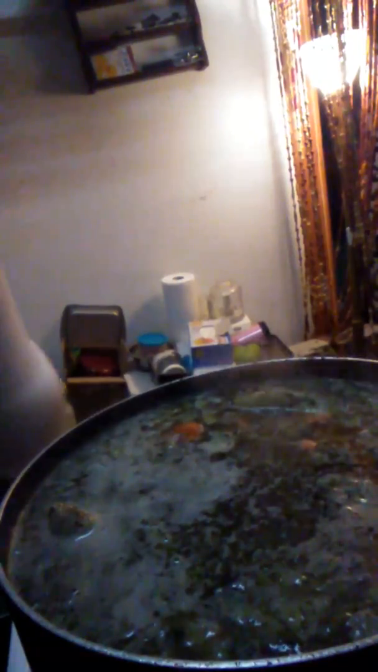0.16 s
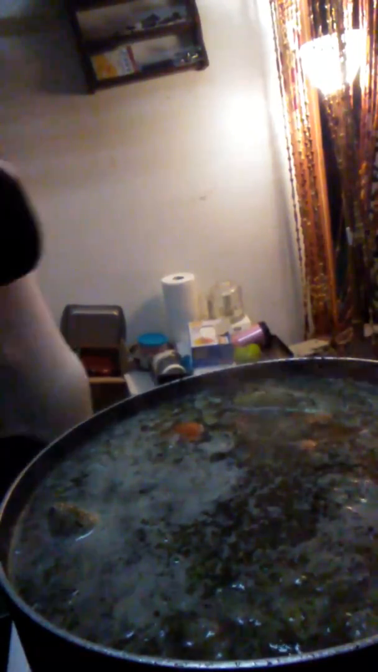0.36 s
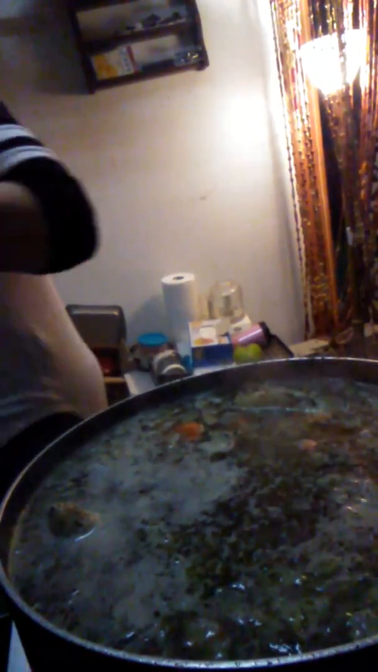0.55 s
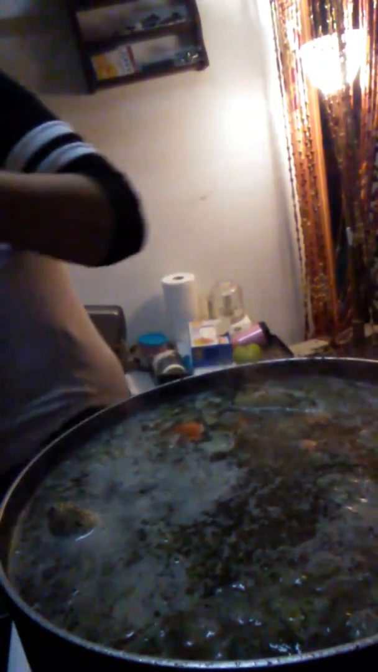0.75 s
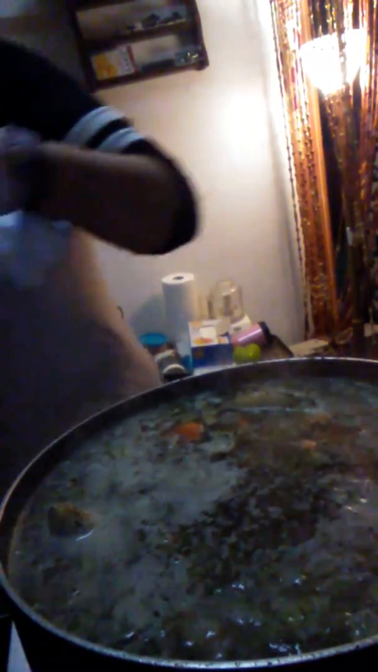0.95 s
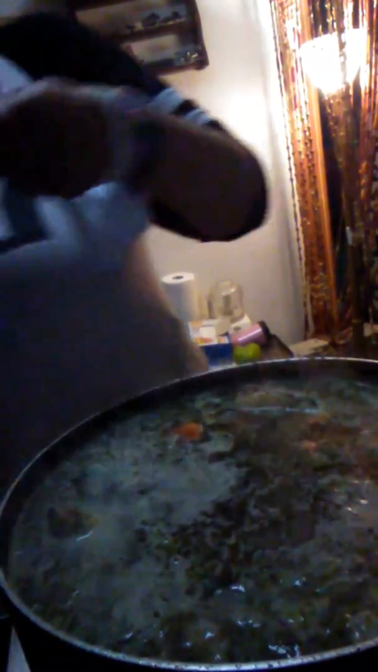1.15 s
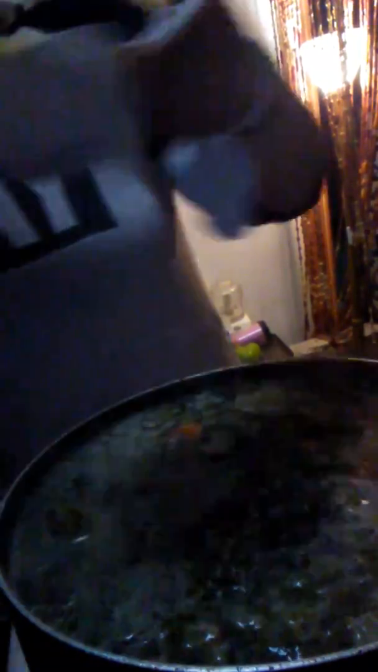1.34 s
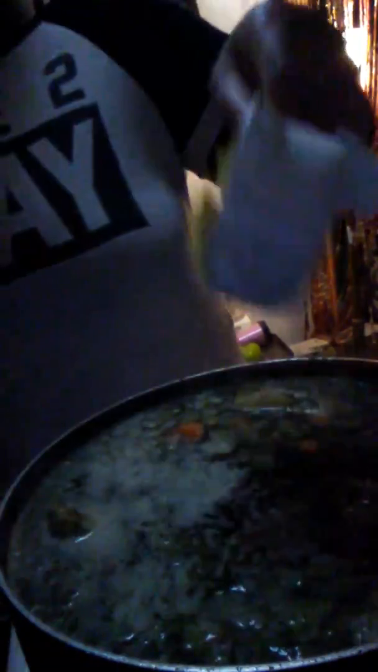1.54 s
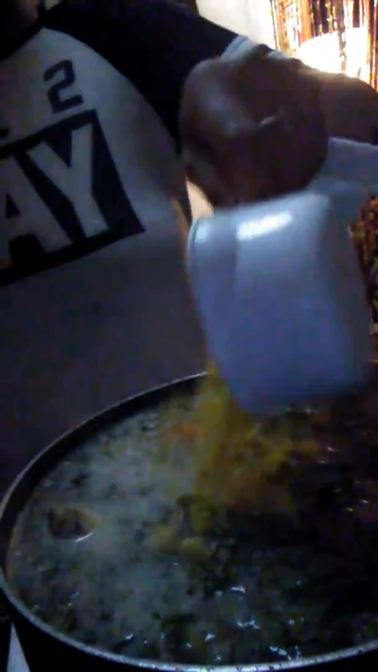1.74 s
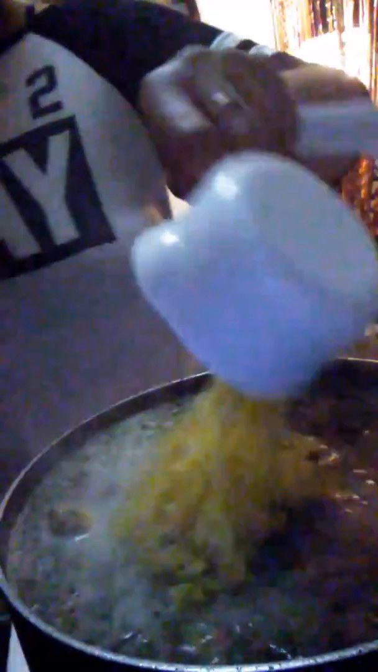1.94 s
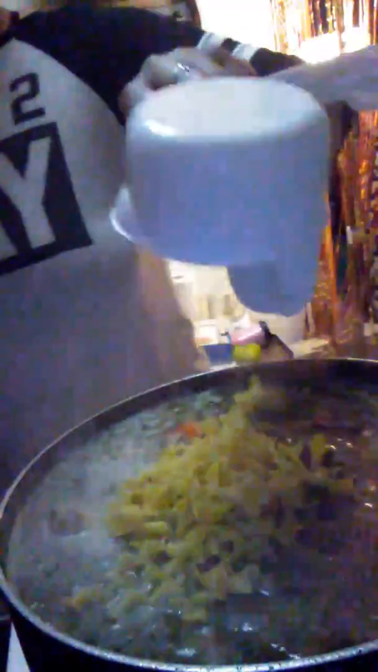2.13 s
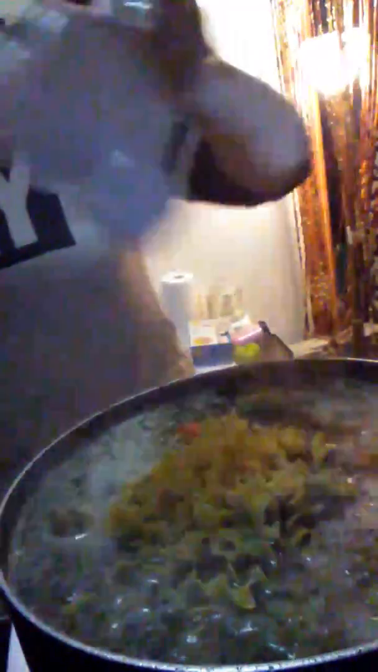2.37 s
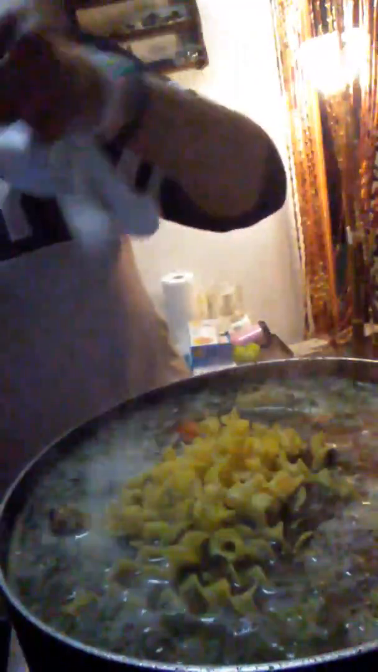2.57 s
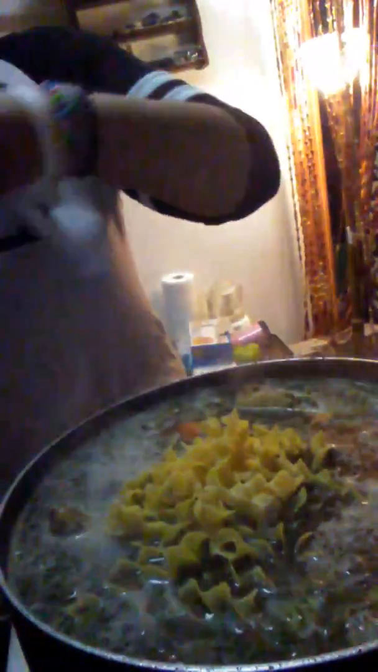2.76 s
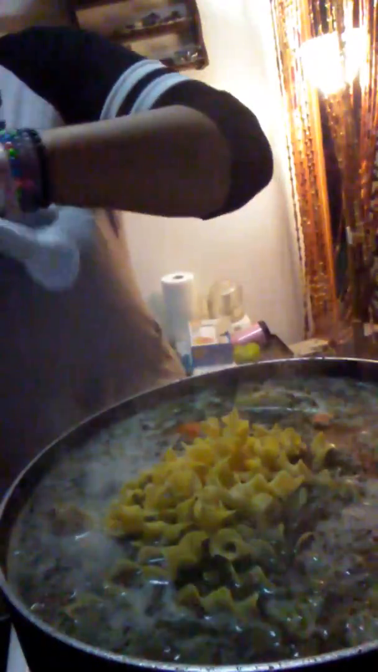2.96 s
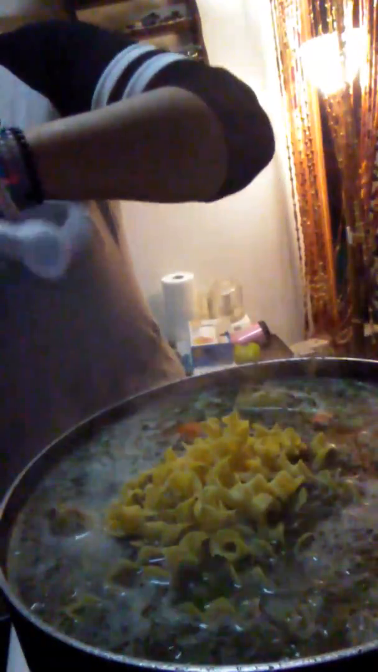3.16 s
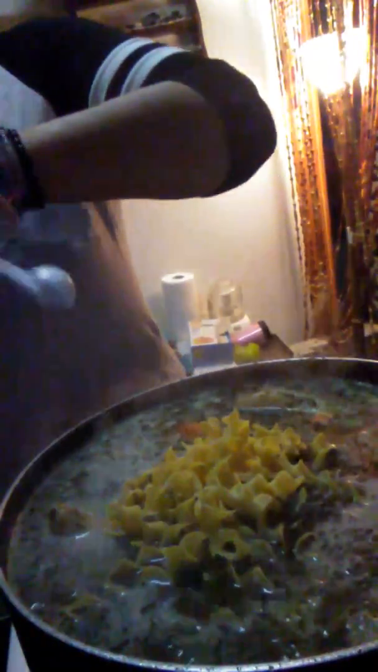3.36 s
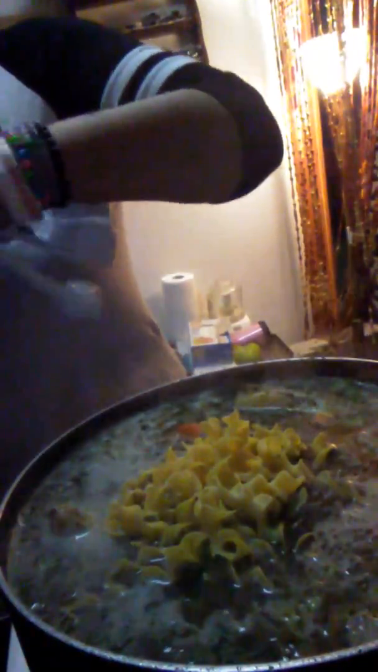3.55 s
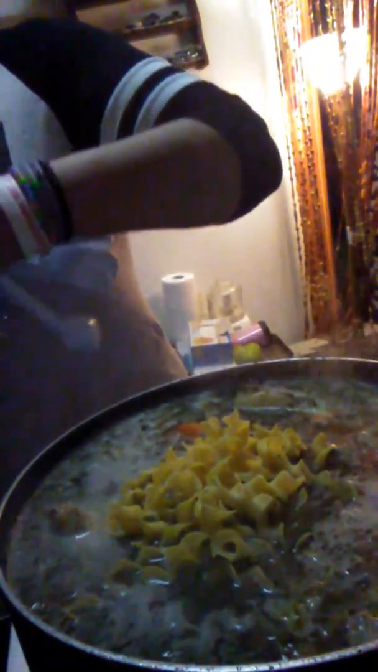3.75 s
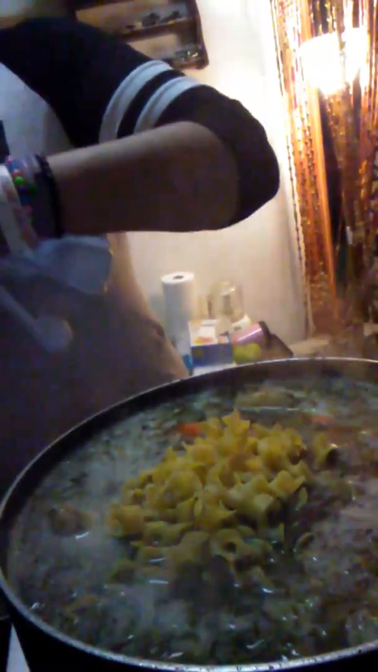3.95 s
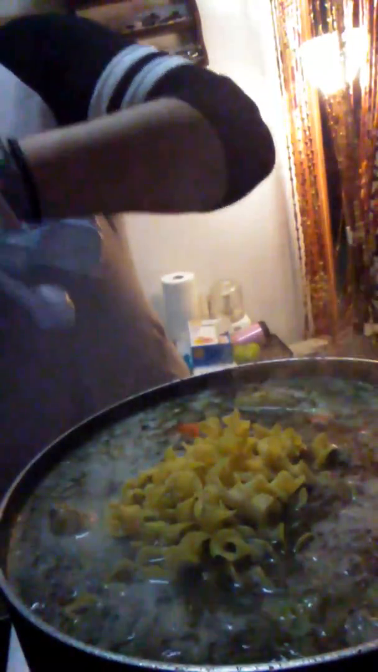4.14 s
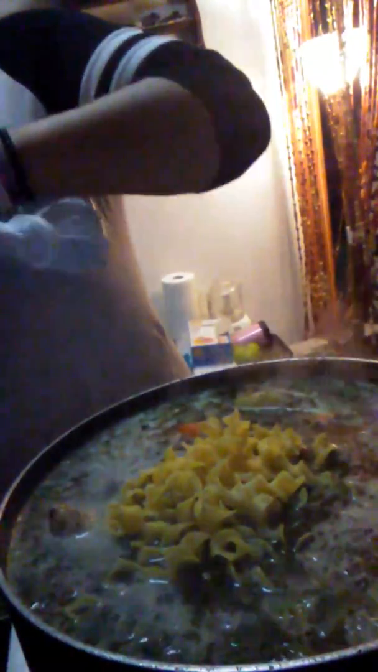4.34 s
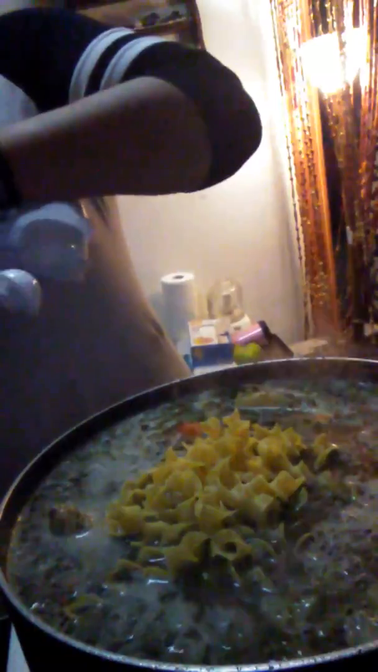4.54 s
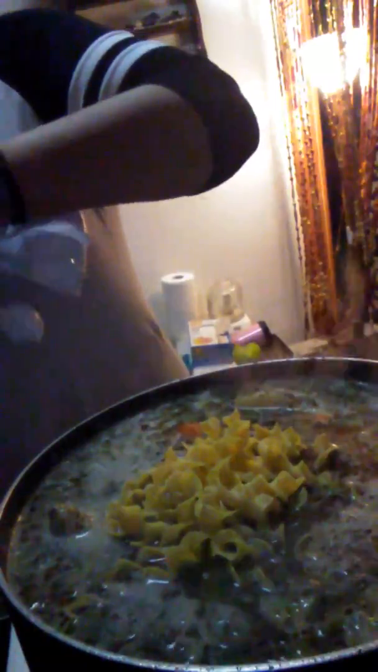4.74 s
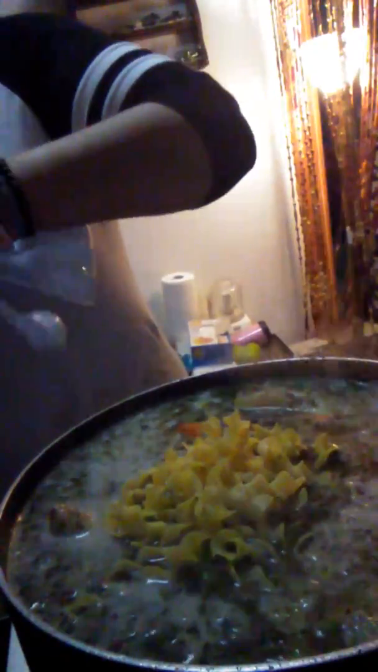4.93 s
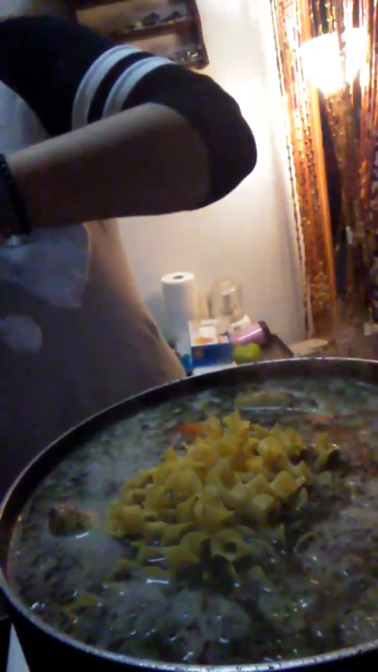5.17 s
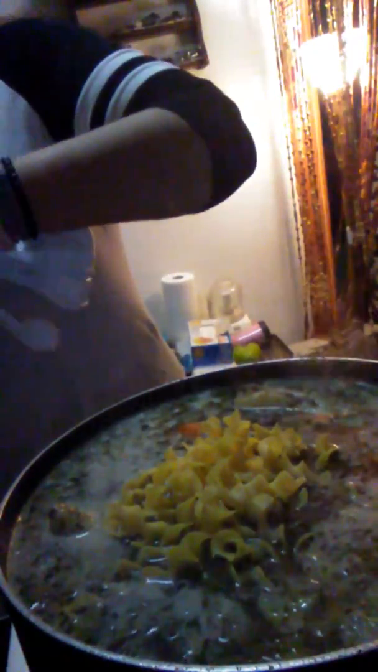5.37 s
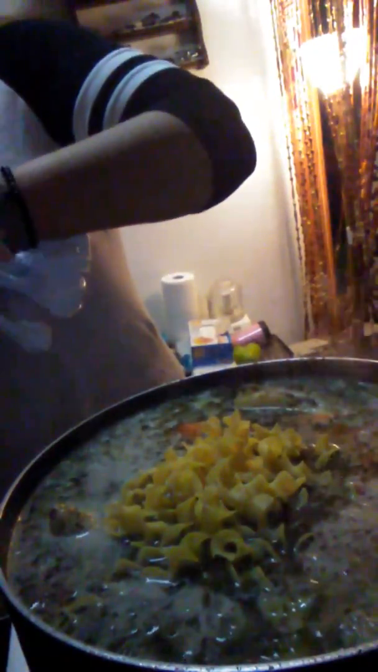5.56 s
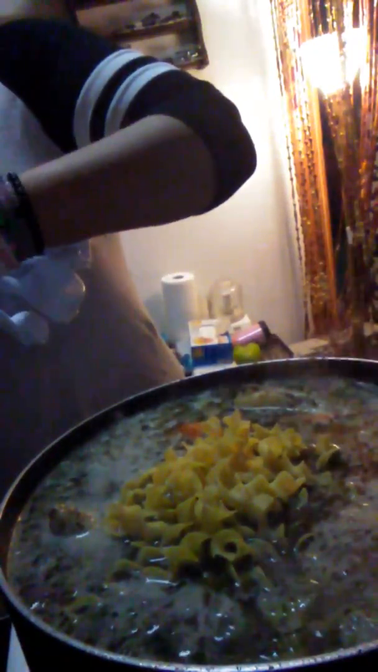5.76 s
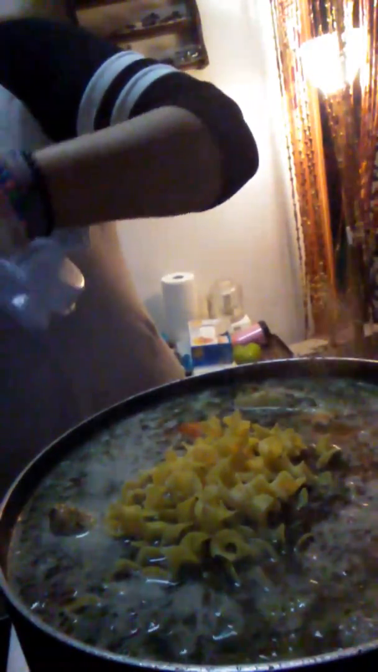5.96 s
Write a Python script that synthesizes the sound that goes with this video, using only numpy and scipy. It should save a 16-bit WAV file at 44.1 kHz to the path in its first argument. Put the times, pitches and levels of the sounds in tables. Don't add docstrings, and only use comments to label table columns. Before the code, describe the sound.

Dry noodles rustle in a plastic bag, clatter from a cup into a simmering pot, then rattle loudly in repeated hard shakes.

```python
import sys
import numpy as np
from scipy import signal
from scipy.fft import rfft, irfft
from scipy.io import wavfile
from scipy.ndimage import uniform_filter1d

SR = 44100
rng = np.random.default_rng(int(sys.argv[2]) if len(sys.argv) > 2 else 0)


def linear_from_db(decibels):
    return 10 ** (np.asarray(decibels, float) / 20)


def generate_wav(signal):
    frames = np.transpose(np.atleast_2d(signal))
    scaled = np.clip(frames, -1, 1) * 32767
    pcm = np.round(scaled).astype(np.int16)
    wavfile.write(sys.argv[1], SR, pcm)


N = 264776


def evened(x):
    return x / np.sqrt(np.mean(x ** 2) + 1e-20)


def read(points, hz):
    f, value = np.transpose(points)
    return np.interp(np.log(hz + 1), np.log(f + 1), value)


def add(mix, s, sound):
    part = mix[..., round(s * SR):][..., :sound.shape[-1]]
    part += sound[..., :part.shape[-1]]


def coloured(x, colour, body=()):
    hz = np.fft.rfftfreq(len(x), 1 / SR)
    lift_db = sum(db / (1 + (2 * (hz - f) / width) ** 2) for f, width, db in body)
    return irfft(rfft(x) * linear_from_db(read(colour, hz) + lift_db), len(x))


def ringing(x, hz, width):
    r = np.exp(-np.pi * width / SR)
    poles = [1, -2 * r * np.cos(2 * np.pi * hz / SR), r * r]
    once = signal.lfilter([1, 0, -1], poles, x)
    return evened(signal.lfilter([1, 0, -1], poles, once))


def lumps(count, seconds):
    span = max(round(seconds * SR / 16), 2)
    coarse = rng.standard_normal(count // 16 + 2)
    coarse = uniform_filter1d(uniform_filter1d(coarse, span), span)
    return np.interp(np.arange(count) / 16, np.arange(len(coarse)), evened(coarse))


def clumps(count, per_s, lasts):
    draw = rng.random(count) * SR / per_s
    landed = signal.lfilter([1], [1, -np.exp(-1 / (lasts * SR))], -np.log(np.minimum(draw, 1)))
    return evened(np.log(landed + 0.43) - np.log(landed + 0.34).mean())


def grains(count, lo_hz, hi_hz, per_s, spread_db, cycles, drift_db, kinds):
    out = np.zeros(count)
    for hz in np.geomspace(lo_hz, hi_hz, kinds):
        draw = rng.uniform(-1, 1, count) * kinds * SR / per_s
        hit = np.flatnonzero(abs(draw) < 1)
        blows = np.zeros(count)
        blows[hit] = np.sign(draw[hit]) * linear_from_db(spread_db * np.minimum(-np.log(abs(draw[hit])), 5))
        blows *= linear_from_db(drift_db * lumps(count, 0.056))
        turns = np.arange(round(8 * cycles * SR / hz)) * hz / SR
        click = np.sin(2 * np.pi * turns) * turns * np.exp(-turns / cycles)
        click /= np.linalg.norm(click)
        out += np.sqrt(hz) * signal.oaconvolve(evened(blows), click)[:count]
    return out


def splinters(count, colour, body):
    draw = rng.random(count) * SR / 160
    blows = (draw < 1) * linear_from_db(2.3 * np.minimum(-np.log(draw + 1e-12), 3))
    tail = np.exp(-np.arange(800) / SR / 0.0014)
    hiss = np.diff(rng.standard_normal(count + 1))
    return evened(coloured(hiss, colour, body)) * signal.oaconvolve(blows, tail)[:count]


def busier(thin_db, rel_db, follow):
    return rel_db - 20 + follow * (thin_db + 20)


def rattle(efforts, middle_law, hollow_law, slips, colour, body, per_s, spread_db, lumpy_db, slip_db,
           pitched_db, hollow_slip_db, drift_db, thin_hz, rise_s, thin_slip_db):
    s, effort_db = np.transpose(efforts)
    t = np.arange(s[0], s[-1], 1 / SR)
    count = len(t)
    thin_db = np.interp(t, s, effort_db)
    power = linear_from_db(2 * np.array([thin_db, busier(thin_db, *middle_law), busier(thin_db, *hollow_law)]))

    after, pitched = np.arange(SR // 5) / SR, np.zeros(count)
    onset = 1 - np.exp(-after / rise_s)
    jostle = rng.standard_normal((len(slips), len(after)))
    for (at, peak_db, middle, hz, t60), noise in zip(slips, jostle):
        thin = thin_slip_db - 18 * max(np.log2(4500 / hz), 0)
        shares_db = np.array([[thin], [middle], [middle + hollow_slip_db]])
        add(power, at - s[0], linear_from_db(2 * (peak_db + slip_db + shares_db) - 120 * after / t60) * onset ** 2)
        tumble = onset * linear_from_db(pitched_db - 60 * after / t60) * ringing(noise, hz, 0.19 * hz)
        add(pitched, at - s[0], linear_from_db(peak_db + slip_db) * tumble)

    thin_clicks = grains(count, thin_hz, 16400, per_s, spread_db, 0.87, drift_db, kinds=12)
    middle_clicks = grains(count, 1030, 0.906 * thin_hz, 0.6 * per_s, spread_db, 1.22, drift_db, kinds=10)
    hollow_clicks = grains(count, 154.6, 928, 0.3 * per_s, 1.12 * spread_db, 0.53, 1.5, kinds=8)

    clumps_db = lumpy_db * clumps(count, per_s=24, lasts=0.014)
    out = pitched + linear_from_db(-8) * np.sqrt(power[0]) * splinters(count, colour, body)
    for p, clicks in zip(power, (thin_clicks, middle_clicks, hollow_clicks)):
        unevenness = linear_from_db(clumps_db + 1.1 * lumpy_db * lumps(count, 0.022))
        out += np.sqrt(p) * evened(coloured(clicks, colour, body) * unevenness)
    return s[0], out


# start in seconds, peak in dB, pitch in Hz, t60 in seconds.
POT_BUBBLES = [(0.57, -37, 744, 0.046), (0.675, -32, 623, 0.071), (1.136, -53, 620, 0.11),
               (1.428, -55, 557, 0.27), (1.506, -57, 573, 0.13), (1.547, -46, 620, 0.071),
               (1.649, -42, 607, 0.07), (1.746, -48, 604, 0.13), (1.867, -38, 617, 0.075),
               (2.127, -42, 633, 0.081), (2.276, -49, 614, 0.063), (2.31, -47, 610, 0.064),
               (2.367, -53, 614, 0.091), (2.477, -54, 625, 0.1), (2.567, -43.5, 630, 0.061)]
# time in seconds, level in dB.
BOIL_LEVEL = [(0.0, -52), (0.25, -53), (0.33, -41.5), (0.87, -46.5), (1.0, -43.5), (2.0, -48), (2.17, -56),
              (2.29, -44), (6.0, -63)]
# frequency in Hz, density in dB per Hz.
BOIL_COLOUR = [(8.8, -50), (15, -23), (27, -40), (59, 7), (119, -2), (178, -15.5), (200, -13), (260, -20),
               (440, -120)]
# frequency in Hz, density in dB per Hz.
SIMMER_COLOUR = [(76, -41), (130, 4), (363, -2), (554, -0.5), (625, 3), (812, -4), (1710, 2.5), (2220, -14),
                 (2830, -26), (4320, -60), (6470, -13), (11600, -28), (16000, -38)]


def pot(shakes):
    out, t = np.zeros(N), np.arange(SR // 4) / SR
    for s, peak_db, hz, t60 in POT_BUBBLES:
        swell = 1 - np.exp(-t / 0.0048)
        add(out, s, linear_from_db(peak_db + 12 - 60 * t / t60) * swell * np.sin(2 * np.pi * hz * t))

    now = np.arange(N) / SR
    s, boil_db = np.transpose(BOIL_LEVEL)
    boil = linear_from_db(np.interp(now, s, boil_db))
    effort_db = np.interp(now, *np.transpose(shakes), left=-90)
    jolt = linear_from_db(-46.5 + 0.79 * (effort_db + 23.5))
    rumble = evened(coloured(rng.standard_normal(N), BOIL_COLOUR + [(400, -62)]))

    fizz = coloured(rng.standard_normal(N), [(60, -50)] + SIMMER_COLOUR, [(559, 37, 6.7)])
    fizz *= linear_from_db(1.7 * lumps(N, 0.019))
    return out + np.hypot(boil, jolt) * rumble + linear_from_db(-52) * evened(fizz)


# time in seconds, effort in dB.
BAG_HANDLING = [(0.0, -24.5), (0.09, -37), (0.27, -39), (0.36, -48), (0.65, -42), (0.72, -42), (0.935, -53),
                (1.017, -27.5), (1.14, -44)]
# start in seconds, peak in dB, middle clicks in dB relative to it,
# pitch of the pieces in Hz, t60 in seconds.
BAG_SLIPS = [(0.0186, -23, 4.5, 6400, 0.21), (0.0967, -9.5, -32, 5330, 0.15),
             (0.2324, -17.5, -21, 6500, 0.26), (0.3217, -19, -8, 7840, 0.17), (0.34, -20, -4, 8400, 0.44),
             (0.386, -17.5, -2, 7400, 0.28), (0.4494, -19.5, -2, 6960, 0.17), (0.526, -17, -6, 6980, 0.16),
             (0.5584, -14.5, -11.5, 5150, 0.14), (0.6285, -39, -15, 6880, 0.073),
             (0.6595, -16.5, -3.5, 5900, 0.21), (0.71, -14.5, -4.5, 6200, 0.31),
             (0.7524, -15, -3, 6480, 0.069), (0.943, -17.5, -7, 8450, 0.19),
             (0.9592, -14, -1.5, 5630, 0.12), (1.0086, 2.5, -8, 6300, 0.039),
             (1.0274, -12.5, -7, 6470, 0.13), (1.1094, -22, -20, 6940, 0.073)]
BAG_CREAKS = [(0.1093, -14, -29, 2460, 0.22), (0.2107, -15, -25, 2300, 0.098),
              (0.8043, -20.5, -19, 3200, 0.13), (1.0496, -12, -8, 3970, 0.15)]
# frequency in Hz, density in dB per Hz.
BAG_COLOUR = [(88, -36), (150, -9), (303, -13), (622, -5), (686, -15), (1210, -10.5), (2250, -6.5),
              (3390, -4.5), (6700, 4), (9000, -2), (11600, -10.5), (15800, -22)]
# frequency in Hz, width in Hz, lift in dB.
BAG_RESONANCES = [(2750, 950, 3), (5570, 400, 2)]


def rustling():
    return rattle(
        BAG_HANDLING, (-9, 0.85), (-18, 0.7), BAG_SLIPS + BAG_CREAKS, BAG_COLOUR, BAG_RESONANCES,
        per_s=7000, spread_db=2, lumpy_db=1.5, slip_db=-10.5, pitched_db=-5.5, hollow_slip_db=-9,
        drift_db=1, thin_hz=4300, rise_s=0.0017, thin_slip_db=0.3)


# start in seconds, peak in dB, pitch in Hz.
NOODLE_CRACKS = [(0.0975, -18, 4900), (0.3899, -15, 7400), (0.6707, -18, 6100), (0.7527, -14, 6500),
                 (0.9417, -15, 8100), (0.96, -19, 2770), (1.0088, -1, 6500), (0.7095, -20, 2800),
                 (0.527, -25, 7000), (1.16, -24, 6800), (1.3252, -32, 6740),
                 (1.6837, -10, 8100), (1.686, -9, 6440), (1.7379, -3, 7400), (1.7383, -12, 6200),
                  (1.742, -9, 6800), (1.801, -6, 6400), (1.8142, -7, 5700), (1.8216, -7, 7800),
                  (1.8317, -5, 9600), (1.8591, -18, 5800), (1.87, -14, 6300), (1.8765, -1, 8500),
                  (1.8844, -4, 6200), (1.8903, -4, 5750), (1.9361, -14, 9100), (1.941, -11, 6200),
                  (1.954, -3, 6700), (1.996, -3, 7500), (2.0084, -6, 7500), (2.0187, -4, 6900),
                  (2.026, -6, 6500), (2.0907, -2, 7900), (2.125, -11, 8800), (2.142, -9, 6500),
                  (2.1828, -12, 6800), (2.1964, -14, 8300), (2.2625, -20, 9000),
                 (2.6726, -21, 7000), (2.7132, -22, 7100), (2.7397, -8.5, 2730), (2.7496, -4, 6900),
                      (2.777, -1, 6300), (2.8412, -13, 6500), (2.8586, -12, 9300), (2.8753, -6, 8200),
                      (2.9049, -8, 5200), (2.9256, -16, 5370), (2.9671, -11, 2800), (2.9849, -13, 6300),
                      (2.994, -20, 2900), (3.0147, -8, 5700), (3.0888, -8, 5300), (3.0966, -5, 5400),
                      (3.1194, 0, 5600), (3.1712, -4, 7100), (3.2273, -7, 6300), (3.2393, 0, 5800),
                      (3.2592, -2, 7500), (3.2818, -2, 6800), (3.3605, 1, 8800), (3.3806, -13, 5900),
                      (3.4056, -1, 7400), (3.4199, 0, 6000), (3.4496, -1, 5900), (3.4947, -5, 6100),
                      (3.5521, -2, 6500), (3.5925, -2, 5800), (3.8423, -8, 6600), (3.8503, -4, 7400),
                      (3.8582, -5, 6500), (3.8721, -6, 6100), (3.8859, -1, 6600), (3.9688, -1, 7100),
                      (4.0871, -11, 3600), (4.1698, -9, 7000), (4.226, -12, 6100), (4.2353, 4, 6100),
                      (4.2787, -12, 3900), (4.295, -6, 6700),
                 (4.339, 11, 6560), (4.4152, -4, 6600), (4.4539, -9, 7500), (4.4602, 1, 6300),
                     (4.503, -10, 6100), (4.51, -7, 5800), (4.519, -5, 6700), (4.5265, 1.5, 3970),
                     (4.5655, -15, 6500), (4.6488, -4.5, 2530), (4.6611, -8, 6800), (4.6825, -7, 6040),
                     (4.7383, 0, 6960), (4.7578, -8, 6700), (4.8014, -8, 6700), (4.8246, -1.5, 6600),
                     (4.8513, -12, 3100), (4.8649, -8, 8000), (4.8752, -8, 7000), (4.882, 2, 8800),
                     (4.9043, -4, 6700), (4.9234, -8, 6800), (4.9456, -11, 7000), (4.953, 2, 6360),
                     (4.9612, -3, 5900), (4.9922, -3, 6700), (5.0277, -8, 3500), (5.0415, 3, 6200),
                     (5.068, -4, 3900), (5.097, 2, 7000), (5.1524, -10, 8300), (5.2027, -20, 6800),
                     (5.213, -14, 7200), (5.22, -3, 6000), (5.2427, -12, 6300), (5.3107, -7, 8800),
                     (5.328, -6, 6800), (5.4283, -8, 6600), (5.4485, -11, 6500), (5.4973, -15, 6800),
                     (5.5156, -8, 6797), (5.5234, 0, 3870), (5.536, -7, 6500), (5.6431, -28, 2500),
                     (5.6555, -20, 3500), (5.6605, -2.5, 6610), (5.681, -5, 6700), (5.7221, -14, 6950),
                     (5.7314, -8, 8100), (5.7693, -3, 4650), (5.8052, -3, 6600), (5.8337, -14, 6300),
                     (5.8837, -10, 6100), (5.9198, -10, 2500), (5.953, -4, 6600),
                 (3.047, 1, 6500), (3.053, 3, 7000), (3.176, -2, 6960), (3.335, -4, 7000), (3.664, -2, 6600),
                (3.69, 2, 7000), (3.712, -2, 6400), (3.75, -2, 7200), (3.928, -2, 7100), (3.99, -5, 6500),
                (4.035, -2, 6800), (4.0538, -2, 7400), (4.255, -7, 6500), (4.35, -1, 6400),
                (4.709, -4, 6600), (5.087, -3, 7000), (5.275, -4, 6900), (2.4375, -37, 9000)]


def snaps():
    rebounds, rebound_s = 20, 0.0066
    out, t = np.zeros(N), np.arange(120) / SR
    rows = NOODLE_CRACKS
    for s, peak_db, hz in rows:
        late, tune = rng.random((2, rebounds))
        delay = np.append(0, 0.0006 + 3 * rebound_s * late ** 1.5)
        pitch = hz * np.append(1, 0.86 + 0.57 * tune)[:, None]
        u = t * pitch / 0.75
        cracks = u * np.exp(1 - u) * np.sin(2 * np.pi * pitch * t)
        edge_hz = 2.04 * np.minimum(pitch, 7500)
        cracks += linear_from_db(-11) * 2 * u * np.exp(1 - 2 * u) * np.sin(2 * np.pi * edge_hz * t)
        weaker = linear_from_db(-5) * np.exp(-delay[1:] / rebound_s) * np.cos(40 * tune)
        for d, size, crack in zip(delay, np.append(1, weaker), cracks):
            add(out, s + d, linear_from_db(peak_db + 0.1) * size * crack)
    return out


# start in seconds, level in dB, #
# pitch in Hz, length in seconds.
LOW_THUMPS = [(0.33, -43, 540, 0.055), (0.437, -40, 766, 0.048), (0.715, -42, 535, 0.042),
              (0.88, -47, 720, 0.044), (1.001, -42, 490, 0.041), (1.199, -45, 205, 0.064),
              (1.303, -45.5, 1000, 0.043), (1.868, -44, 430, 0.059), (2.664, -31.5, 657, 0.03),
              (3.163, -29.5, 425, 0.05), (2.73, -36, 150, 0.094), (5.681, -36, 110, 0.14),
              (4.2, -28, 760, 0.16), (1.237, -45.5, 460, 0.12), (1.953, -40, 160, 0.093),
              (2.437, -47, 378, 0.031)]


def thumps():
    out, t = np.zeros(N), np.arange(SR // 4) / SR
    for s, db, hz, lasts in LOW_THUMPS:
        swell = np.sin(np.pi * np.minimum(t / lasts, 1))
        add(out, s, linear_from_db(db) * ringing(rng.standard_normal(len(t)), hz, 0.31 * hz) * swell)
    return out


# time in seconds, effort in dB.
CUP_CARRIED = [(1.14, -41.5), (1.308, -43.5), (1.324, -45), (1.378, -37), (1.63, -51), (1.68, -50),
               (1.69, -36), (1.737, -26.5)]
CUP_POURING = [(1.74, -15), (1.79, -25), (1.985, -19.5), (2.001, -14.5), (2.153, -24), (2.187, -30),
               (2.26, -44.5), (2.587, -52.5), (2.661, -52)]
# start in seconds, peak in dB, middle clicks in dB relative to it,
# pitch of the pieces in Hz, t60 in seconds.
CUP_SLIPS = [(1.1584, -23, -3, 7340, 0.08), (1.199, -25, -18, 5840, 0.11), (1.314, -14, -25, 6900, 0.084),
             (1.3226, -12.5, -25, 6700, 0.14), (1.5744, -37, -14, 6860, 0.06),
             (1.6337, -31, -22, 6460, 0.086), (1.656, -16, -36, 6000, 0.53), (1.6831, -1, -39, 8000, 0.045),
             (1.738, 0, -26, 7000, 0.077), (1.7993, -18, -19, 6330, 0.06), (1.822, -2, -10.5, 6510, 0.045),
             (1.8562, -24, -23, 6400, 0.06), (1.8881, 3.5, -17, 5800, 0.057),
             (1.9444, -7.5, -2.5, 6700, 0.081), (1.995, 6.5, -30, 7500, 0.039),
             (2.0087, -3, -24, 7140, 0.074), (2.0224, 0, -15, 6600, 0.065), (2.039, -16, 2, 7000, 0.1),
             (2.0894, -3.5, -19, 6550, 0.052), (2.14, -3, -11.5, 6700, 0.065),
             (2.198, -9, -26, 7850, 0.042), (2.35, -25, -30, 7050, 0.13), (2.436, -29, -10, 7500, 0.11)]
CUP_CREAKS = [(1.2371, -36, 9, 2490, 0.12), (1.552, -26, -5, 2780, 0.076), (2.262, -23.5, 1, 4300, 0.052),
              (2.4386, -27, 0, 1770, 0.11)]
# frequency in Hz, density in dB per Hz.
CUP_COLOUR = [(88, -31.5), (150, -20), (250, -23), (610, -13), (1050, -21), (1250, -9.5), (2960, -1),
              (4040, -5.5), (4900, -4.5), (5500, -8), (6600, 1.5), (9500, -8.5), (14000, -17), (15800, -25)]
# frequency in Hz, width in Hz, lift in dB.
CUP_RESONANCES = [(1310, 60, 5.4), (5670, 190, 9.5), (6480, 130, 3.1), (8800, 1000, 5.6)]


def tipping():
    return rattle(
        CUP_CARRIED + CUP_POURING, (-12, 1.02), (-28, 0.45), CUP_SLIPS + CUP_CREAKS, CUP_COLOUR, CUP_RESONANCES,
        per_s=4500, spread_db=1, lumpy_db=1, slip_db=-13.5, pitched_db=0, hollow_slip_db=-11,
        drift_db=0.5, thin_hz=5300, rise_s=0.00067, thin_slip_db=-5)


# start in seconds, peak in dB, favoured pitch in Hz,
# contact length in seconds.
CUP_KNOCKS = [
    (1.747, -30, 1250, 0.053),
    (2.136, -23.5, 1400, 0.0091),
    (2.639, -21, 1600, 0.0037),
    (2.657, -28, 1200, 0.014),
    (2.725, -17, 1600, 0.013),
    (3.93, -17, 1400, 0.097),
    (3.998, -13, 1400, 0.039),
    (4.24, -23, 1300, 0.018),
]
# frequency in Hz, level in dB, t60 in seconds.
CUP_MODES = [(1134, 7.5, 0.056), (1250, 7.5, 0.087), (1400, 0.5, 0.077), (1633, 13.5, 0.043),
             (1750, -4, 0.067), (2225, 14.5, 0.061)]


def knocks():
    out, t = np.zeros(N), np.arange(SR // 4) / SR
    for s, peak_db, near_hz, lasts in CUP_KNOCKS:
        focus_db = 1200 * lasts
        ring = np.zeros(len(t))
        for hz, db, t60 in CUP_MODES:
            mode_db = db - focus_db * abs(np.log2(hz / near_hz)) - 60 * t / t60
            ring += linear_from_db(mode_db) * np.sin(2 * np.pi * hz * t)
        rub = rng.standard_normal(len(t)) * np.exp(-(t / lasts) ** 2)
        blow = 3 * np.sin(np.pi * np.minimum(t / 0.0006, 1)) ** 2
        knock = signal.fftconvolve(ring * (1 - np.exp(-t / 0.0033)), rub + blow)[:len(t)]
        add(out, s, linear_from_db(peak_db) * knock / abs(knock).max())
    return out


# full strength from in seconds, length in seconds, effort in dB.
BAG_SHAKES = [(2.67, 0.023, -60), (2.758, 0.005, -18.5), (2.883, 0.17, -26.5), (2.997, 0.071, -14.5),
              (3.117, 0.16, -16.5), (3.316, 0.33, -16), (3.656, 0.11, -10.5), (3.857, 0.075, -19.5),
              (3.976, 0.087, -12), (4.183, 0.028, -19), (4.249, 0.13, -12), (4.431, 0.079, -15),
              (4.555, 0.21, -17.5), (4.874, 0.03, -15.5), (4.942, 0.035, -20.5), (5.051, 0.048, -14),
              (5.162, 0.033, -23), (5.244, 0.037, -15), (5.308, 0.046, -14), (5.392, 0.08, -20),
              (5.522, 0.021, -13), (5.686, 0.025, -18.5), (5.743, 0.043, -17), (5.838, 0.0055, -23.5),
              (5.913, 0.063, -23.5)]


def shake_efforts():
    rise, sag, fall = 284, 6, 212
    t = np.arange(BAG_SHAKES[0][0] - 0.004, N / SR, 0.002)
    s, lasts, db = np.transpose(BAG_SHAKES)[..., None]
    shape_db = rise * np.minimum(t - s, 0) - sag * np.clip(t - s, 0, lasts)
    shape_db = shape_db - fall * np.maximum(t - s - lasts, 0)
    return np.transpose([t, 10 * np.log10(linear_from_db(2 * (db + shape_db)).sum(0))])


# start in seconds, peak in dB, middle clicks in dB relative to it,
# pitch of the pieces in Hz.
SHAKE_SLIPS = [(2.671, -8, -2, 7300), (2.714, -12, -3, 6370), (2.742, 5.5, -5, 6380),
               (2.8405, -5.5, -9, 6440), (2.862, 0.5, -4, 6440), (2.9944, 2, -23, 6010),
               (3.0953, 7, -27, 5740), (3.1747, 8, -4.5, 6960), (3.237, 2.5, -10, 6000),
               (3.2796, 4, -25, 7170), (3.357, 3.5, -5, 3670), (3.404, 4.5, -27, 8500),
               (3.4494, 4.5, -1.5, 6334), (3.5508, 4.5, -32, 6400), (3.924, 4.5, -5, 7000),
               (3.9684, -28, -12, 6490), (4.1693, 3.5, -28, 7350), (4.415, 6, -18, 6250),
               (4.4563, 7, -26, 6700), (4.524, 4.5, -25, 6500), (4.7, 2, -2, 6400),
               (4.8253, -0.5, -13, 7000), (4.8638, -7, -23, 7050), (4.992, 2.5, -14, 6902),
               (5.217, -1, -0.5, 6200), (5.313, 1.5, 0, 7200), (5.5146, 3.5, -7, 3530),
               (5.657, -2, -3, 6890), (5.885, 0.5, -3.5, 7250), (5.95, -6, -18, 7080)]
# frequency in Hz, density in dB per Hz.
SHAKE_COLOUR = [(76, -56), (130, -9.5), (183, -9.5), (257, -9.5), (452, 0), (876, -5), (1360, -10),
                (1600, -6.5), (2870, 0), (4640, -4), (7080, 2), (14300, -19.5), (15800, -31)]
# frequency in Hz, width in Hz, lift in dB.
SHAKEN_BAG_RESONANCES = [(182, 77, 8.3), (453, 370, 4.7), (752.5, 19, 9.4), (1400, 400, 7.4), (6380, 120, 2.1)]


def shaking(shakes):
    slips = [(*row, 0.091) for row in SHAKE_SLIPS]
    return rattle(
        shakes, (-5, 0.9), (-10, 0.85), slips, SHAKE_COLOUR, SHAKEN_BAG_RESONANCES,
        per_s=8000, spread_db=2.5, lumpy_db=0.89, slip_db=-15.5, pitched_db=-4.5, hollow_slip_db=-4,
        drift_db=1.03, thin_hz=4160, rise_s=0.0014, thin_slip_db=0.5)


# frequency in Hz, t60 in seconds.
ROOM_DECAY = [(200, 0.48), (2000, 0.23), (8000, 0.12), (16000, 0.14)]


def kitchen(x):
    out, at = np.zeros(N), np.arange(100, SR // 2 - 20, 20)
    for k in range(3):
        taps = np.zeros(SR // 2)
        taps[at + rng.integers(0, 20, len(at))] = rng.choice([-1., 1.], len(at))
        hz, t, z = signal.stft(taps, SR, nperseg=256)
        decay = linear_from_db(-60 * t / read(ROOM_DECAY, hz)[:, None])
        tail = signal.istft(z * decay, SR, nperseg=256)[1]
        turn = np.sqrt(2 / 3) * np.cos(np.pi * (5 * np.arange(N) / SR + k / 3))
        out += signal.fftconvolve(x * turn, tail / np.linalg.norm(tail))[:N]
    return out


def scene():
    shakes = shake_efforts()
    hands = snaps() + thumps() + knocks()
    add(hands, *rustling())
    add(hands, *tipping())
    add(hands, *shaking(shakes))
    return (pot(shakes) + hands + linear_from_db(-11.5) * kitchen(hands))[None]


def roll_off(x):
    return signal.sosfilt(signal.butter(12, 16440, fs=SR, output="sos"), x)


def record(dry):
    squeezed = 0.8 * dry / (1 + abs(dry / 1.15) ** 4) ** 0.25
    edge = signal.firwin(1501, 15790, window=("kaiser", 8), fs=SR)
    finished = signal.oaconvolve(squeezed, edge[None], "same")
    return roll_off(finished)


dry = scene()
out = record(dry)
generate_wav(out)
```